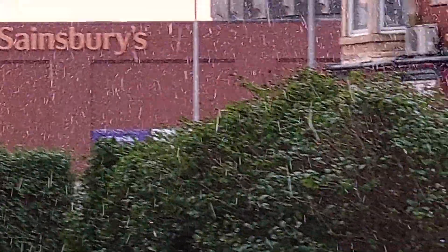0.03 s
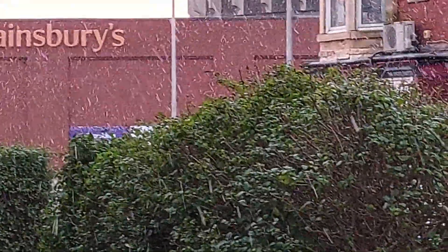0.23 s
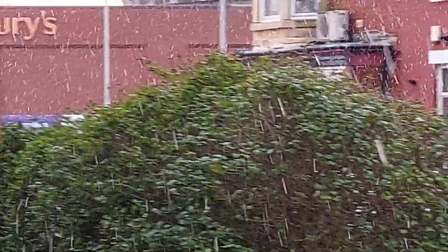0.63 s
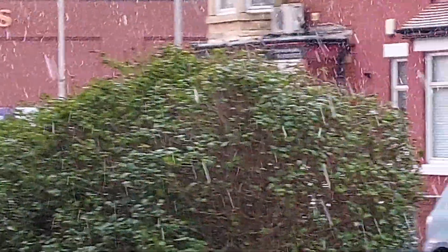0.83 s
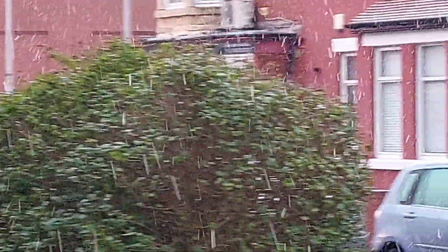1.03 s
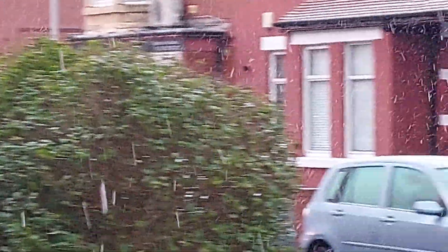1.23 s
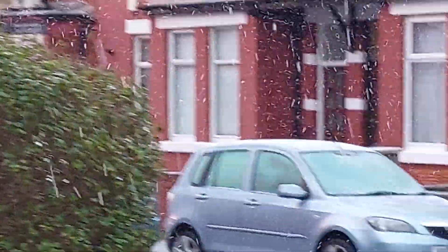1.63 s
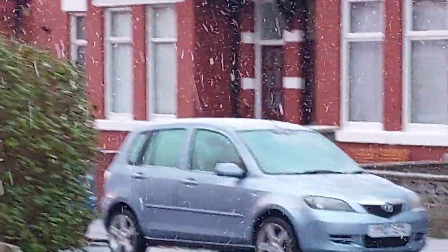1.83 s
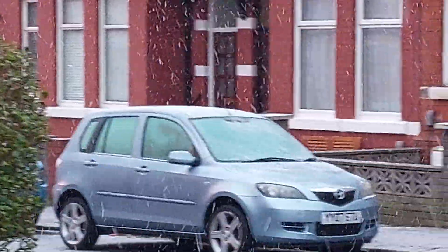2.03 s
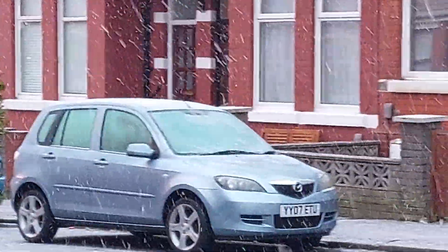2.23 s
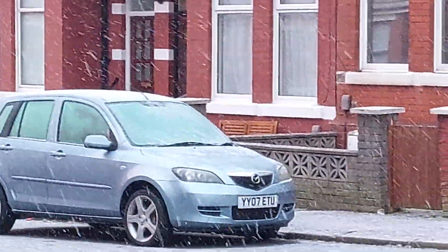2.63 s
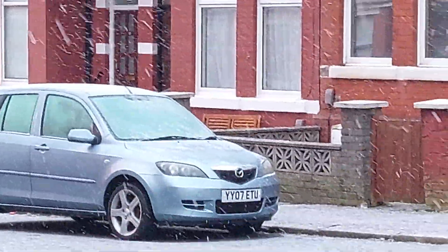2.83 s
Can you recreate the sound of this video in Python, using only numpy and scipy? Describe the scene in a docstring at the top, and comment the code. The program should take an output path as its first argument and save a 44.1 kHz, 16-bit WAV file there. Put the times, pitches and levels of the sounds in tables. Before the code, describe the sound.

Light wind buffeting the microphone over a dull hush of distant traffic.

```python
"""Snowfall on a quiet street

A hand-held stereo microphone, outdoors among houses. Light wind buffets its two ports separately,
over the dull hush of tyres and engines streets away. One gust brings an airy rush and two faint moans.
A few flakes tick close by in a faint hiss, and late on a thin whirr comes and goes."""
import sys
import numpy as np
from scipy import signal
from scipy.fft import rfft, irfft
from scipy.io import wavfile
from scipy.ndimage import uniform_filter1d

SR = 44100
rng = np.random.default_rng(int(sys.argv[2]) if len(sys.argv) > 2 else 0)


def to_wav(s):
    """Save 16-bit WAV."""
    ch = np.atleast_2d(s).T  # columns
    pcm = np.round(np.clip(ch, -1, 1) * 32767)  # PCM
    wavfile.write(sys.argv[1], SR, pcm.astype(np.int16))


N = 132300

# light turbulence at the microphone: time_s, level_db
BREEZE_LEVEL = [(0, -51.5), (.25, -43), (.52, -55), (.8, -45.5), (1.3, -47.5), (1.58, -56), (1.8, -42),
                (2.08, -52.5), (2.22, -47), (2.36, -52), (2.72, -40.5), (2.9, -55), (3, -42.5)]
# colour of wind on a port: frequency_hz, relative_db
WIND_COLOUR = [(10, -48), (22, -26), (45, -3), (65, 2), (135, -1.5), (190, -12.5), (270, -19.5),
               (400, -40.5), (800, -45.5), (2500, -81.5)]
# distant tyre roar: time_s, level_db
TYRE_LEVEL = [(0, -54), (.55, -53.5), (.68, -51.5), (1.1, -50.5), (1.6, -56), (1.9, -51.5), (2.15, -55.5),
              (2.55, -54), (3, -57)]
# colour of the tyre roar: frequency_hz, relative_db
TYRE_COLOUR = [(20, -6), (70, 8.5), (185, -2.5), (385, -4), (520, -1.5), (690, -0.5), (800, -5), (1010, -2),
               (1400, -8), (2000, -13), (2450, -24), (2900, -36.5), (4200, -44), (8000, -72)]
# steady drone of far engines: frequency_hz, relative_db
ENGINE_COLOUR = [(30, -9), (80, -1.5), (185, -8.5), (225, 1), (275, 3.5), (325, -2.5), (380, -18.5),
                 (800, -45)]
# how alike the street sounds at the two ports: frequency_hz, likeness (-1..1)
TRAFFIC_LIKENESS = [(60, 0.43), (270, 0.77), (520, 0.86), (690, 0.69), (800, .3), (950, 0.25),
                    (1200, 0.063), (2000, 0.099), (4000, .1)]
# faint hiss: time_s, level_db
HISS_LEVEL = [(0, -77), (.15, -73.5), (.4, -78), (.8, -75), (1.25, -75.5), (1.6, -78), (1.9, -72),
              (2.08, -74.5), (2.5, -72.5), (2.8, -74), (3, -75.5)]
# colour of the hiss: frequency_hz, relative_db
HISS_COLOUR = [(1500, -7), (4000, -6.5), (5900, -7.5), (6500, -3), (7800, -1.5), (9200, -3.7), (11400, -2),
               (12000, -4), (12900, -3.8), (13600, -.3), (16000, .3)]
# eddies striking one port: centre_s, length_s, level_db, port (0 left, 1 right)
EDDIES = [(.075, .025, -37.5, 0), (0.142, 0.013, -26.5, 0), (0.174, 0.052, -39.5, 1),
          (.226, .027, -36.5, 0), (0.402, .03, -31.5, 0), (0.646, 0.066, -25, 1), (0.762, 0.075, -24.5, 0),
          (0.792, .032, -28, 1), (0.84, 0.016, -23, 1), (0.839, 0.036, -29, 0), (0.876, 0.033, -23, 1),
          (0.907, 0.046, -23.5, 0), (.948, 0.047, -43, 1), (1.042, 0.033, -30.5, 1),
          (1.044, 0.091, -37.5, 0), (1.14, 0.06, -32.5, 1), (1.24, 0.1, -30, 1), (1.459, 0.049, -41.5, 0),
          (1.493, 0.023, -33.5, 1), (1.731, 0.053, -29.5, 0), (1.853, 0.02, -29.5, 0),
          (1.9, 0.037, -29.5, 1), (1.972, 0.031, -32.5, 1), (2.032, 0.024, -32, 0),
          (2.198, 0.084, -33.5, 0), (2.267, 0.025, -33, 0), (2.454, 0.025, -26, 1),
          (2.514, 0.057, -32.5, 0), (2.581, 0.024, -35.5, 1), (2.654, 0.015, -32, 1),
          (2.717, 0.042, -42.5, 0)]
# airy rush of the strongest gust: time_s, level_db
RUSH_LEVEL = [(0, -93), (.58, -103), (.65, -73.5), (.82, -82.5), (1.04, -70), (1.3, -75), (1.55, -88),
              (3, -100)]
# colour of the rush: frequency_hz, relative_db
RUSH_COLOUR = [(500, -20), (1500, -2), (2400, -7.5), (3200, -7), (3900, -20.5), (6000, -24.5)]
# faint moans of the gust: centre_s, length_s, pitch_hz, level_db
GUST_MOANS = [(0.651, 0.035, 1003, -58), (0.711, 0.066, 695.4, -58)]
# flakes landing close by: start_s, level_db
FLAKE_LANDINGS = [(1.262, -70), (1.847, -69.5), (1.978, -81), (2.1, -75), (2.175, -72), (2.26, -74),
                  (2.325, -77), (2.744, -67.5)]
# colour of a flake's tick: frequency_hz, relative_db
FLAKE_COLOUR = [(1500, -5), (4000, -8), (7500, -2), (9500, -6), (15000, -7)]
# thin whirr: time_s, level_db
WHIRR_LEVEL = [(0, -110), (1.6, -100), (1.8, -71.5), (2.1, -64.5), (2.59, -64.5), (2.65, -75.5), (2.8, -81),
               (3, -100)]
# colour of the whirr: frequency_hz, relative_db
WHIRR_COLOUR = [(600, -25), (1150, -10), (1330, 10.5), (1520, -10.5), (2000, -8.5), (2380, 3), (2620, -1.5),
                (2790, -20), (3200, -16.5), (4000, -32.5), (8000, -47)]

STREET_LEFT_DB = -1.5  # left minus right: the street sits slightly to the right
T = np.arange(N) / SR
HZ = np.fft.rfftfreq(N, 1 / SR)


def amp(db):
    """Decibels to gain."""
    return 10 ** (np.asarray(db) / 20)


def unit(x):
    """Scales to rms 1."""
    return x / np.sqrt(np.mean(x ** 2) + 1e-30)


def at_hz(points, hz):
    """Reads a spectrum table on a log-frequency axis."""
    f, value = np.transpose(points)
    return np.interp(np.log(hz + 1), np.log(f + 1), value)


def level(points):
    """Gain over time from a table of time_s, level_db."""
    return amp(np.interp(T, *np.transpose(points)))


def pan(left_db):
    """Channel gains, the left one left_db above the right."""
    return amp([[left_db / 2], [-left_db / 2]])


def drift(rate_hz):
    """Slow random motion of rms 1."""
    return unit(irfft(rfft(rng.standard_normal(N)) * np.exp(-(HZ / rate_hz) ** 2) * (HZ > 0), N))


def tinted(x, colour, octaves=0):
    """Filters by a spectrum table, shifted by some octaves."""
    return irfft(rfft(x) * amp(at_hz(colour, HZ / 2 ** octaves)), N)


def wash(colour, likeness, patchy_db, left_lead_rad=0):
    """Stereo noise of rms 1 whose spectrum swells and sinks in small patches."""
    hz = np.fft.rfftfreq(2048, 1 / SR)
    a, b, c, d, patches = rng.standard_normal((5, N // 512 + 6, len(hz)))
    patches = uniform_filter1d(patches, size=10, axis=0)
    patches = unit(uniform_filter1d(patches, size=9, axis=1))
    same = at_hz(likeness, hz) if np.ndim(likeness) else likeness
    left = a + 1j * b
    right = same * left + np.sqrt(1 - same ** 2) * (c + 1j * d)
    spectra = np.array([left * np.exp(1j * left_lead_rad), right])
    spectra *= amp(at_hz(colour, hz) + patchy_db * patches)
    _, noise = signal.istft(spectra.transpose(0, 2, 1), nperseg=2048, noverlap=1536)
    return unit(noise[:, :N])


def breeze():
    """Weak lumpy turbulence right on the microphone, unrelated between the ports."""
    ports = []
    for _ in range(2):
        rumble = tinted(rng.standard_normal(N), WIND_COLOUR, octaves=-0.25)
        lumps = amp(drift(rate_hz=35))
        ports.append(unit(rumble * lumps))
    return level(BREEZE_LEVEL) * np.array(ports)


def traffic():
    """Tyre roar and engine drone from streets away, with the treble lost on the way."""
    turn_start_s, turn_end_s, shade_hz, shade_db = 0.57, 1.96, 880, -2.5
    roar = wash(TYRE_COLOUR, TRAFFIC_LIKENESS, patchy_db=1.5, left_lead_rad=-0.31)
    treble = irfft(rfft(roar) * HZ ** 2 / (HZ ** 2 + shade_hz ** 2), N)
    # the roar dulls as the microphone turns away from it
    shade = level([(turn_start_s, 0), (turn_end_s, shade_db)])
    tyres = level(TYRE_LEVEL) * (roar + (shade - 1) * treble)
    engines = amp(db=-59.5) * wash(ENGINE_COLOUR, TRAFFIC_LIKENESS, patchy_db=0)
    return pan(STREET_LEFT_DB) * (tyres + engines)


def hiss():
    """A very faint high hiss, wide and a little to the left, that flickers slightly."""
    flicker = amp(db=0.68 * drift(rate_hz=14))
    return level(HISS_LEVEL) * pan(left_db=2.4) * flicker * wash(HISS_COLOUR, likeness=0, patchy_db=0)


def buffets():
    """Each eddy is a short, square-shouldered swell of low pressure noise on one port."""
    octaves_per_db, typical_db, lift_db = 0.0285, -29, 0.5
    out = np.zeros((2, N))
    for centre_s, length_s, db, port in EDDIES:
        half_width_s = 0.51 * length_s
        swell = 1 / (1 + ((T - centre_s) / half_width_s) ** 4)
        octaves = octaves_per_db * (db - typical_db)  # stronger eddies reach higher
        puff = tinted(swell * rng.standard_normal(N), WIND_COLOUR, octaves)
        out[int(port)] += amp(db + lift_db) * unit(puff) * np.sqrt(np.mean(swell ** 2))
    return out


def rush():
    """The air brightens while the strongest gust passes."""
    return level(RUSH_LEVEL) * wash(RUSH_COLOUR, likeness=0.2, patchy_db=-0.5)


def moans():
    """Brief wavering tones out in the street as the gust sets in."""
    waver = 0.01214  # share of the pitch
    out = np.zeros(N)
    for centre_s, length_s, pitch_hz, db in GUST_MOANS:
        cycles = np.cumsum(pitch_hz * (1 + waver * drift(rate_hz=49))) / SR
        swell = np.exp(-2 * ((T - centre_s) / length_s) ** 2)
        out += amp(db) * swell * unit(np.sin(2 * np.pi * cycles))
    return pan(STREET_LEFT_DB) * out


def flakes():
    """Each flake lands near the microphone with a soft tick and a short crumbling tail."""
    rise_s, fade_s, tail_s, tail_db = 0.0012, 0.005, 0.025, -7
    envelope = np.zeros(N)
    for start_s, db in FLAKE_LANDINGS:
        age = np.maximum(T - start_s, 0)
        fade = np.exp(-age / fade_s) + amp(tail_db) * np.exp(-age / tail_s)
        envelope += amp(db) * np.minimum(age / rise_s, 1) * fade
    return envelope * pan(left_db=3) * wash(FLAKE_COLOUR, likeness=0.24, patchy_db=-2)


def whirr():
    """A thin whirr near the centre: two narrow bands of noise, a little under an octave apart."""
    return level(WHIRR_LEVEL) * wash(WHIRR_COLOUR, likeness=0.87, patchy_db=1)


def scene():
    """Wind on the microphone over the sounds of the street."""
    return buffets() + breeze() + traffic() + rush() + moans() + whirr() + hiss() + flakes()


def record(dry):
    """The recorder's low cut and band limit."""
    low_cut_hz, top_hz = 24, 15700
    low_cut = signal.butter(2, low_cut_hz, "highpass", fs=SR, output="sos")
    band_limit = signal.firwin(801, top_hz, window=("kaiser", 9), fs=SR)
    return signal.oaconvolve(signal.sosfilt(low_cut, dry), band_limit[None], "same")


dry = scene()
out = record(dry)
to_wav(out)
```